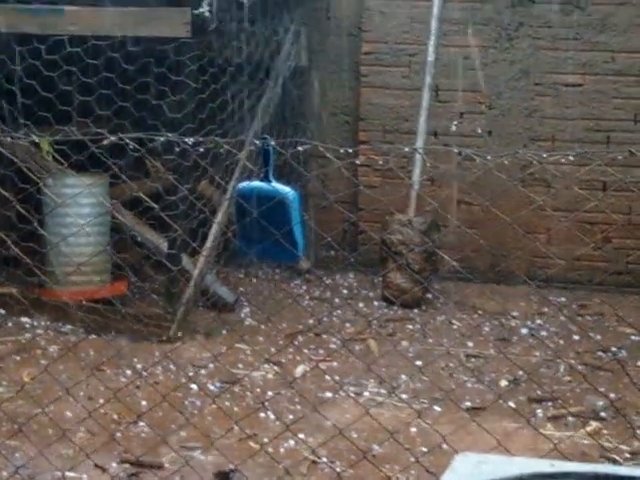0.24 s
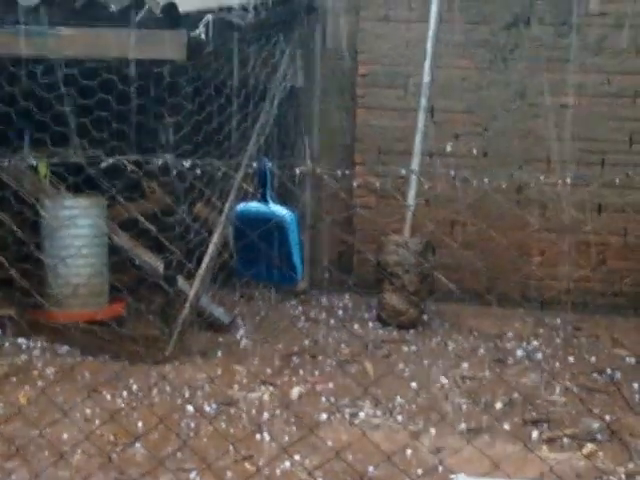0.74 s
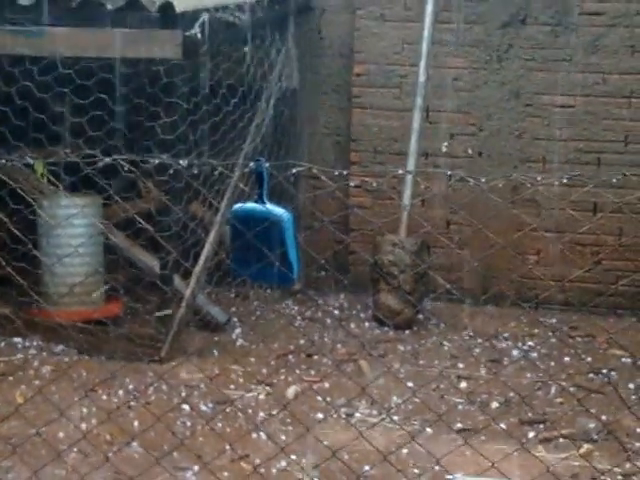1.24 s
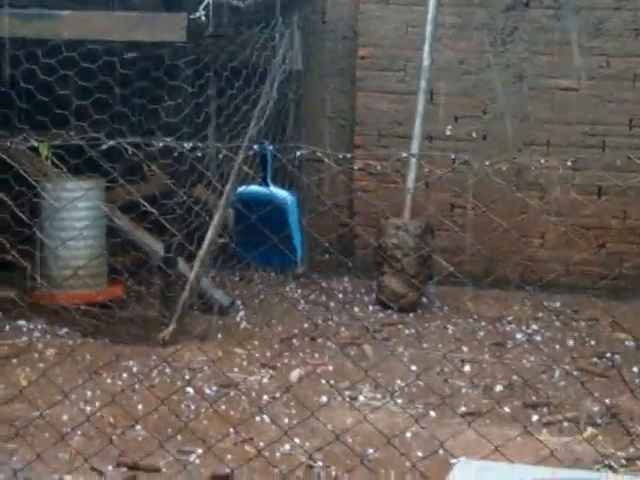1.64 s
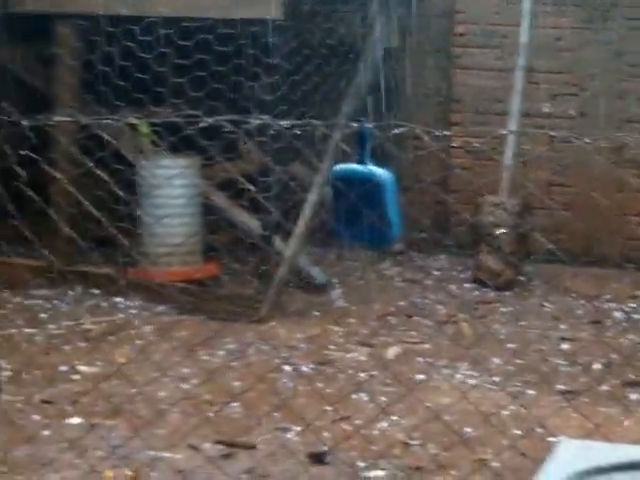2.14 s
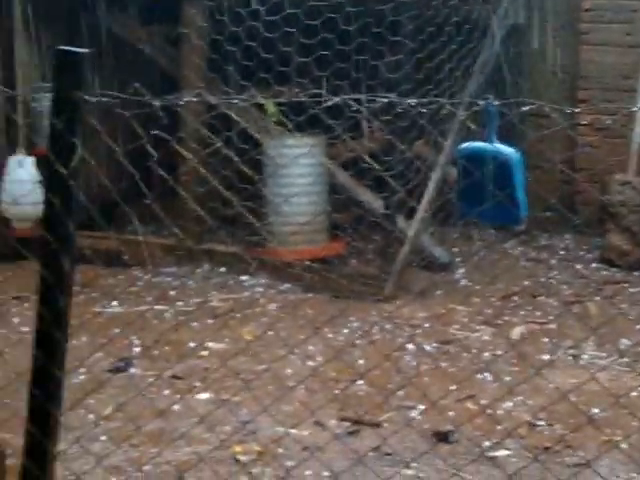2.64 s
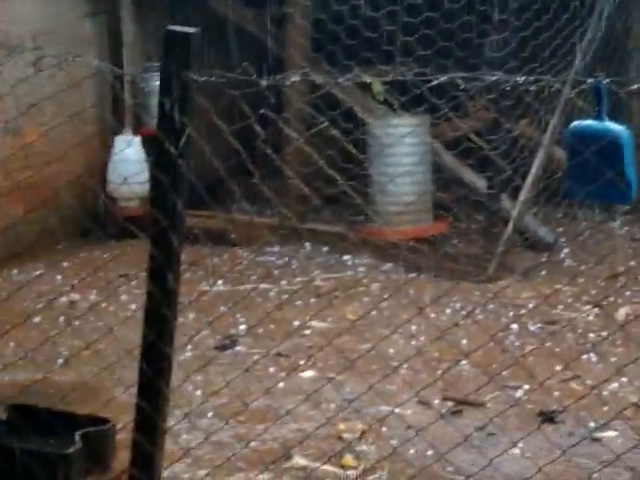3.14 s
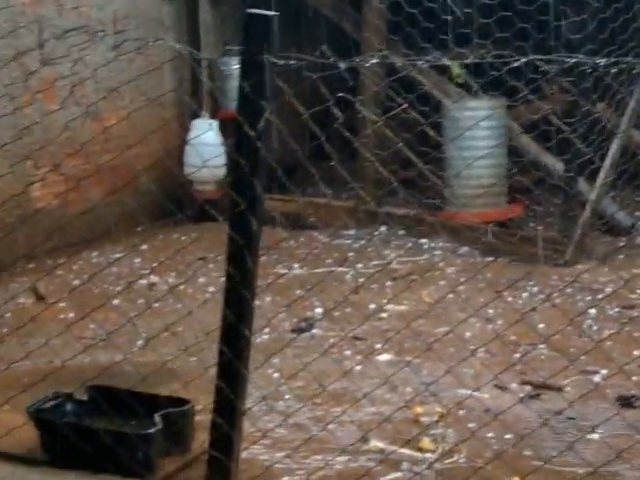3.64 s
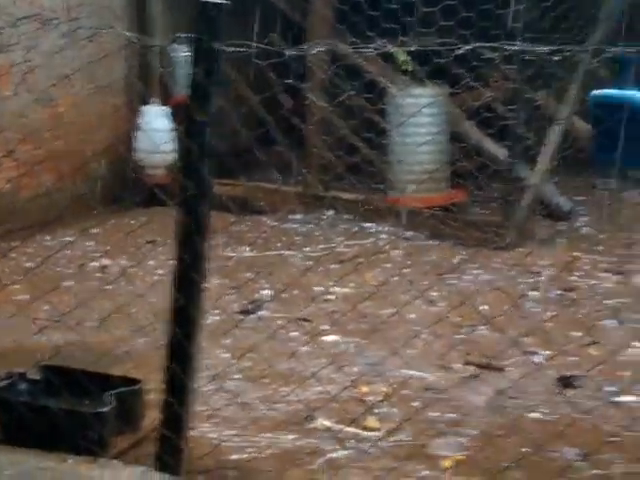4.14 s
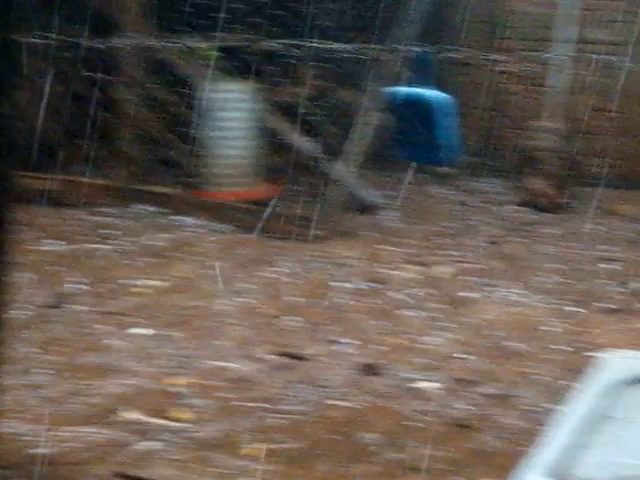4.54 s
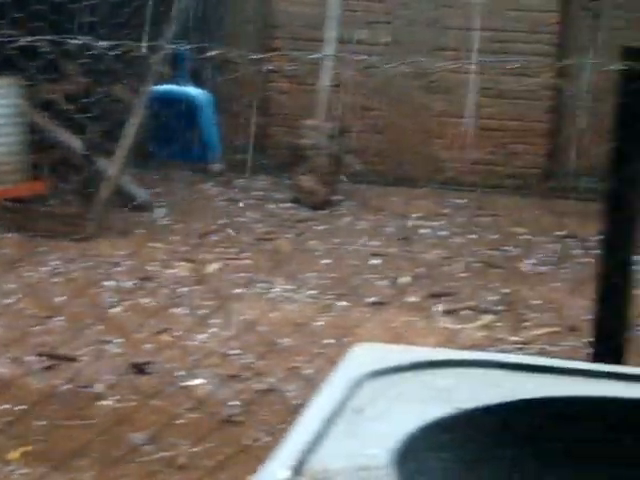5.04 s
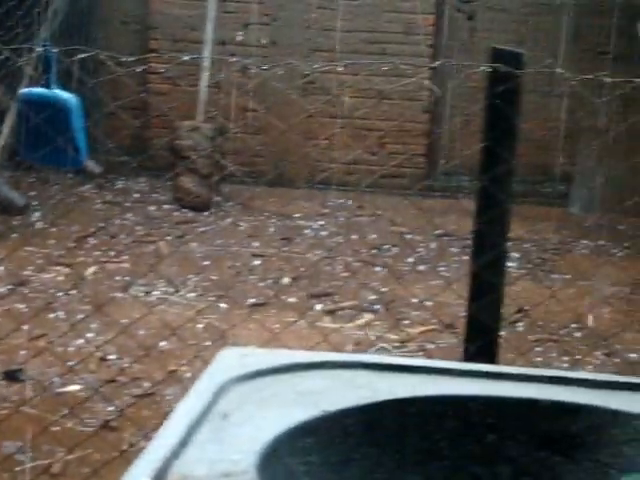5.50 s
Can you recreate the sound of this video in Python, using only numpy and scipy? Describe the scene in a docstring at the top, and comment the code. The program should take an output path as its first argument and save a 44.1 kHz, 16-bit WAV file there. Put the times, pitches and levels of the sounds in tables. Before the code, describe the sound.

A dense hail shower drums in uneven flurries on a shelter roof, with wet splatter, sharp ticks and a steady wash of rain behind.

```python
"""Rain and small hail in a walled yard

Heard in mono from under a shelter, as two identical channels. Stones drum on the roof sheets in flurries
as dull clacks and short rings; rain splatters on wet earth as bursts of filtered clicks and noise.
Near stones tick, knock and crack on hard things, and the walls return a short echo.
Further off, the countless impacts merge into a wash of coloured noise."""
import sys
import numpy as np
from scipy import signal
from scipy.fft import rfft, irfft
from scipy.io import wavfile

SR = 44100
rng = np.random.default_rng(int(sys.argv[2]) if len(sys.argv) > 2 else 0)


def pcm_store(signal):
    """Save signal as 16-bit PCM."""
    levels = np.round(np.clip(np.atleast_2d(signal), -1, 1) * 32767)
    wavfile.write(sys.argv[1], SR, levels.astype(np.int16).T)


N = 254456
T = np.arange(N) / SR  # s

# Layer levels between the bursts, at a shower strength of 0 dB
ROOF_DB, PATTER_DB, SPRAY_DB, HAIL_DB = -30.5, -30.5, -28, -32.5
KNOCKS_DB, SPLASHES_DB, WASH_DB = -4.0, -12.5, -29.5
PATTER_LAW, SPRAY_LAW = 1.64, 0.6  # dB of the layer per dB of the shower
PATTER_FROM_FLURRY, PATTER_FROM_SHEET = 0.56, 0.6  # shares of a burst's energy that fall as fat drops
YARD_T60_S, YARD_DB = 0.17, -24
TOP_HZ = 10100


def undb(db):
    """Decibels to gain."""
    return 10 ** (np.asarray(db) / 20)


def unit(x):
    """Scale to rms 1."""
    return x / np.sqrt(np.mean(x ** 2))


def add(out, s, sound):
    """Mix a sound in at s seconds."""
    i = int(np.clip(s * SR, 0, N - 1))
    out[i:i + len(sound)] += sound[:N - i]


def fade(t, t60):
    """Exponential decay, 60 dB down after t60 seconds."""
    return np.exp(-np.log(1000) * t / t60)


def band(x, lo_hz, hi_hz):
    """Gentle band-pass."""
    edges_hz = [lo_hz, min(hi_hz, SR / 2 - 1)]
    return signal.sosfilt(signal.butter(2, edges_hz, "band", fs=SR, output="sos"), x)


def colour(x, points, size=4096):
    """Minimum-phase filter through (Hz, dB) points, so that impacts keep their sharp front."""
    hz, db = np.transpose(points)
    grid_hz = np.maximum(np.fft.rfftfreq(size, 1 / SR), 1)
    gain_db = np.interp(np.log(grid_hz), np.log(hz), db)
    # Folding the cepstrum forward in time makes the filter causal
    cepstrum = irfft(np.log(undb(gain_db)))
    cepstrum[1:size // 2] *= 2
    cepstrum[size // 2:] = 0
    response = irfft(np.exp(rfft(cepstrum)))
    return signal.fftconvolve(x, response)[:len(x)]


def impacts(per_s, spread_db):
    """Sizes of impacts at random moments: many small ones, a few up to a largest size."""
    struck = rng.random(N) < per_s / SR
    size = np.minimum(rng.standard_exponential(N), 4)
    return struck * undb(spread_db * size)


def clicks(per_s, spread_db):
    """Sharp contacts of either sign."""
    return unit(impacts(per_s, spread_db) * np.sign(rng.standard_normal(N)))


def burst_envelope(sizes, t60):
    """Each impact adds energy that dies away at once; overlapping impacts sum in energy."""
    energy = signal.lfilter([1], [1, -fade(1 / SR, t60) ** 2], sizes ** 2)
    return np.sqrt(energy)


def pings(lo_hz, hi_hz, per_s, spread_db, cycles):
    """Impacts that each ring at the pitch of the spot struck, falling 60 dB in the given cycles."""
    out, t = np.zeros(N), T[:SR // 25]
    sizes = impacts(per_s, spread_db)
    pitch_hz = lo_hz * (hi_hz / lo_hz) ** rng.random(N)
    for i in np.flatnonzero(sizes):
        ring = np.sin(2 * np.pi * pitch_hz[i] * t) * fade(t, cycles / pitch_hz[i])
        add(out, T[i], sizes[i] * ring)
    return unit(out)


def splatter(lo_hz, hi_hz, per_s, spread_db, t60, droplets_per_s, count=5):
    """Impacts throw up short, dying bursts of droplets, in bands each an octave wide."""
    out = np.zeros(N)
    for hz in np.geomspace(lo_hz, hi_hz, count):
        envelope = burst_envelope(impacts(per_s / count, spread_db), t60)
        droplets = envelope * clicks(droplets_per_s, spread_db=1.5)
        out += band(droplets, hz / np.sqrt(2), hz * np.sqrt(2))
    return unit(out)


def bursts(rows, attack_s, t60):
    """Energy of passing bursts: each sets in quickly, holds for its length and thins out."""
    energy = np.zeros(N)
    for s, length, db in rows:
        attack = np.clip((T - s) / attack_s, 0, 1)
        decay = fade(np.maximum(T - s - length, 0), t60)
        energy += (undb(db) * attack * decay) ** 2
    return energy


def roof():
    """Stones on stiff, damped sheets: dull clacks and brief, hollow rings."""
    # Colour of the roof. Each row: frequency in Hz, relative level in dB.
    roof_tone = [(60, -44), (150, -29.5), (280, -19), (400, -15), (520, -13), (750, -1.5), (950, -0.5),
                 (1150, 2), (1450, -3.5), (2000, -21.5), (4000, -37), (10000, -41)]
    clacks = colour(clicks(per_s=1100, spread_db=2.0), roof_tone)
    rings = colour(pings(377, 1654, per_s=650, spread_db=1.5, cycles=21.8), roof_tone)
    return unit(unit(clacks) + undb(-1) * unit(rings))


def flurries():
    """Energy of the flurries of stones on the roof, each thinning out after its last dense moment."""
    # Flurries. Each row: start in seconds, length in seconds, strength in dB.
    flurry_rows = [(0.08, 0.15, 1.5), (0.26, 0.078, 6.5), (0.99, 0.2, 0), (1.28, 0.1, 3), (1.5, 0.12, 3.5),
                   (1.87, 0.04, 0), (2.355, 0.03, 1), (2.58, 0.15, -1), (3.05, 0.14, 4), (3.33, 0.046, 1),
                   (4.12, 0.11, 1.5), (4.9, 0.15, 4), (5.35, 0.17, -2)]
    return bursts(flurry_rows, attack_s=0.022, t60=0.27)


def knocks():
    """A big stone rings a roof sheet for a few cycles, with a rattle of ice."""
    # Big stones on the roof. Each row: time in seconds, peak in dB within this layer, ring in Hz.
    knock_rows = [(0.103, -10, 1090), (0.282, -6.5, 1760), (0.288, -19, 905), (0.299, -6.5, 1080),
                  (0.311, -11, 780), (0.764, -9, 1410), (1.189, -11, 1080), (2.375, -11, 1100),
                  (2.592, -5.5, 1106), (2.66, -10, 1100), (2.833, -8, 1120), (3.062, -10, 1000),
                  (3.096, -5.5, 875), (3.125, -12, 920), (3.157, -12.5, 770), (3.653, -10, 1120),
                  (4.137, -6, 1085), (4.334, -13, 1350), (4.924, -11, 790), (4.955, -8, 1280),
                  (4.975, -10.5, 693), (5.68, -11, 980)]
    out, t = np.zeros(N), T[:SR // 10]
    for s, db, hz in knock_rows:
        ring = band(np.sin(2 * np.pi * hz * t) * fade(t, t60=0.03), 550, 2600)
        rattle = band(rng.standard_normal(len(t)), 700, 2600) * fade(t, t60=0.032)
        knock = ring + undb(0.5) * rattle
        add(out, s, undb(db) * knock / np.abs(knock).max())
    return out


def patter():
    """Fat drops slap the wet earth, and hailstones click and ring briefly among them."""
    # Colour of the wet earth. Each row: frequency in Hz, relative level in dB.
    earth_tone = [(100, -38), (400, -14), (1000, 0.5), (1800, -1), (2600, 1), (3500, -3), (5000, -8),
                  (10000, -40)]
    drops = splatter(696, 5580, per_s=1000, spread_db=1.0, t60=0.083, droplets_per_s=7000)
    stones = pings(1484, 4030, per_s=380, spread_db=1.5, cycles=25.0)
    return unit(colour(drops + undb(-10.5) * stones, earth_tone))


def sheets():
    """Energy of the sheets of rain that sweep the ground near by."""
    # Sheets of rain. Each row: start in seconds, length in seconds, strength in dB.
    sheet_rows = [(0.03, 0.26, -0.5), (0.31, 0.11, -5), (0.75, 0.18, -3.0), (1.08, 0.074, -7),
                  (1.37, 0.032, 4.5), (1.79, 0.17, -1), (2.02, 0.067, 1), (2.28, 0.12, 0.5),
                  (2.58, 0.13, -0.5), (3.04, 0.12, 2.5), (3.25, 0.15, 0.5), (3.6, 0.047, 0),
                  (3.94, 0.09, 1), (4.31, 0.12, -2.5), (4.64, 0.15, 0.5), (4.85, 0.14, -0.5),
                  (5.19, 0.08, -0.5), (5.36, 0.14, -3), (5.6, 0.11, 0)]
    return bursts(sheet_rows, attack_s=0.022, t60=0.22)


def spray():
    """Water bursts into fine, bright droplets, and small ice pellets tick."""
    # Colour of the spray. Each row: frequency in Hz, relative level in dB.
    spray_tone = [(300, -32.5), (1500, -6), (3000, -3.5), (4300, -0.5), (5500, 1.5), (7000, -1), (8500, -4),
                  (10000, -10.5)]
    drops = splatter(3280, 9000, per_s=1100, spread_db=0.5, t60=0.026, droplets_per_s=11000)
    ice = pings(3620, 9000, per_s=270, spread_db=4.5, cycles=44)
    pellets = undb(-16.5) * ice + undb(-18) * clicks(per_s=110, spread_db=1.5)
    return unit(colour(drops + pellets, spray_tone))


def shatter(per_s, spread_db, t60):
    """A hailstone cracks at once and its fragments scatter in a burst of noise that dies away."""
    return unit(burst_envelope(impacts(per_s, spread_db), t60) * rng.standard_normal(N))


def hail():
    """The nearer stones stand out one by one on brick and hard ground."""
    return unit(band(shatter(per_s=70, spread_db=1.0, t60=0.06), 2640, 7500))


def splashes():
    """A near impact on the wet ground bursts into droplets within a few hundredths of a second."""
    # Near drops and stones. Each row: time in seconds, peak in dB within this layer, nominal pitch in Hz.
    splash_rows = [(0.329, 0, 2720), (0.4558, -4, 2020), (0.5098, 0.5, 2510), (0.7714, -8, 4640),
                   (0.89, -2, 2200), (1.166, -2, 5200), (1.295, -1, 4210), (1.3924, -4, 5600),
                   (1.7217, 1.5, 4050), (1.7783, -2, 5320), (2.3694, -1, 2630), (2.3948, -3, 4530),
                   (2.5093, 0.5, 5170), (2.699, -3.5, 2550), (3.2734, -6, 5000), (3.526, -2, 2660),
                   (3.745, 1, 5000), (3.8086, 1, 5350), (3.8404, -6, 7050), (4.3311, -4, 6250),
                   (4.391, -6, 3180), (4.611, 3, 2920), (5.214, 1, 4740), (5.696, -5, 4500)]
    out, t = np.zeros(N), T[:SR // 10]
    for s, db, hz in splash_rows:
        droplets = rng.standard_normal(len(t)) * fade(t, t60=0.04)
        splash = band(droplets, hz / 1.5, hz * 1.26)
        add(out, s, undb(db) * splash / np.abs(splash).max())
    return out


def ticks():
    """A stone right beside the microphone: one hard click and a faint low thud."""
    # Closest stones. Each row: time in seconds, click peak in dB, thud level in dB.
    tick_rows = [(0.3303, -18, -34), (3.695, -8, -40)]
    out, t = np.zeros(N), T[:SR // 10]
    click = band(1.0 * (t == 0), 700, 8500)
    click /= np.abs(click).max()
    thud = np.sin(2 * np.pi * 130 * t) * fade(t, t60=0.012)
    for s, click_db, thud_db in tick_rows:
        add(out, s, undb(click_db) * click + undb(thud_db) * thud)
    return out


def yard(x):
    """Walls and shelter return a short, diffuse echo."""
    t = T[:SR // 2]
    echo = band(rng.standard_normal(len(t)), 160, 9200) * fade(t, YARD_T60_S)
    echo *= t > 0.006  # the first return comes after 6 ms
    return x + undb(YARD_DB) * signal.fftconvolve(x, echo / np.linalg.norm(echo))[:N]


def wash():
    """Distant impacts, too many to tell apart, merge into steady coloured noise."""
    # Colour of the distance. Each row: frequency in Hz, relative level in dB.
    far_tone = [(25, -38), (70, -33.5), (130, -19.5), (250, -11), (450, -1), (900, 5.5), (2000, 4),
                (5000, 1.5), (7000, -10), (10000, -17)]
    return unit(colour(rng.standard_normal(N), far_tone))


def scene():
    """Roof flurries and sheets of rain add to the shower, over the wash of distant rain."""
    # Slow strength of the whole shower. Each row: time in seconds, strength in dB.
    shower_points = [(0.0, 1), (0.55, 2.5), (1.1, 3.0), (1.65, 1.5), (2.25, -0.5), (2.7, 0.5), (3.0, -3),
                     (3.4, 2.0), (3.75, -3), (4.0, 1), (4.27, -2), (4.7, 1.5), (5.3, 2), (5.77, -1)]
    shower_db = np.interp(T, *np.transpose(shower_points))
    flurry, sheet = flurries(), sheets()
    # Shower and bursts add as energy
    on_roof = np.sqrt(undb(shower_db) ** 2 + flurry)
    fat_drops = PATTER_FROM_FLURRY * flurry + PATTER_FROM_SHEET * sheet
    on_earth = np.sqrt(undb(PATTER_LAW * shower_db) ** 2 + fat_drops)
    close_by = np.sqrt(undb(SPRAY_LAW * shower_db) ** 2 + sheet)

    dull = undb(ROOF_DB) * on_roof * roof() + undb(PATTER_DB) * on_earth * patter()
    bright = close_by * (undb(SPRAY_DB) * spray() + undb(HAIL_DB) * hail())
    near = undb(KNOCKS_DB) * knocks() + undb(SPLASHES_DB) * splashes() + ticks()
    mono = yard(dull + bright + near) + undb(WASH_DB) * wash()
    return np.tile(mono, (2, 1))


def record(dry):
    """The recorder cuts the top steeply."""
    return signal.sosfilt(signal.ellip(12, 0.1, 80, TOP_HZ, fs=SR, output="sos"), dry)


dry = scene()
out = record(dry)
pcm_store(out)
```